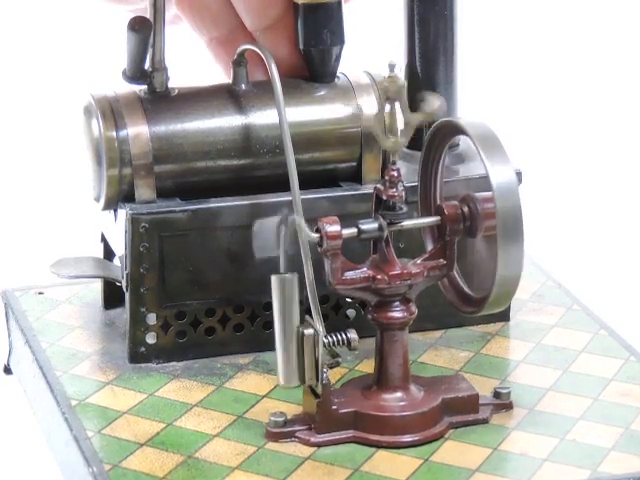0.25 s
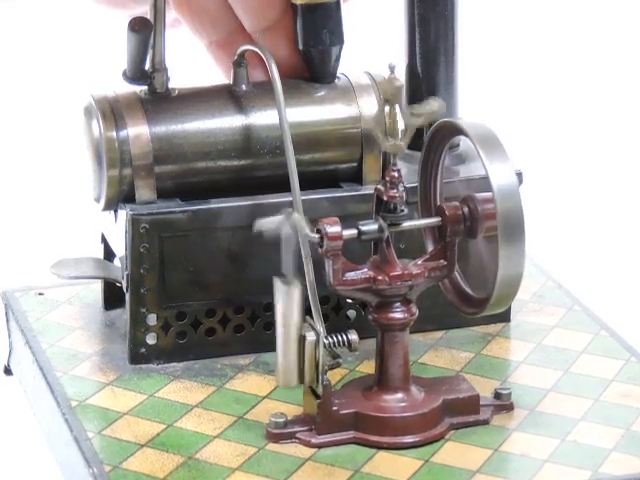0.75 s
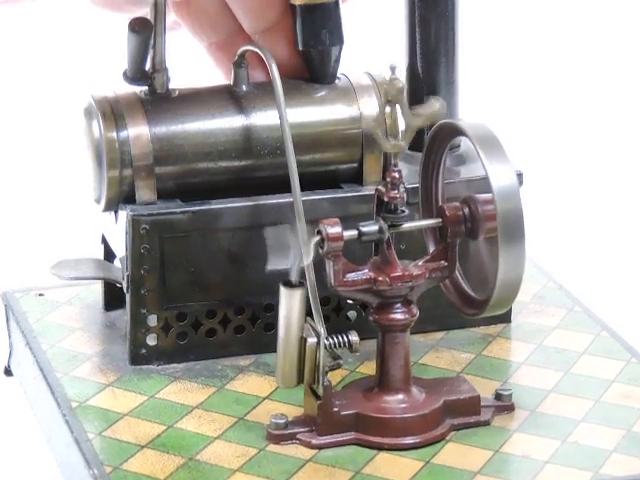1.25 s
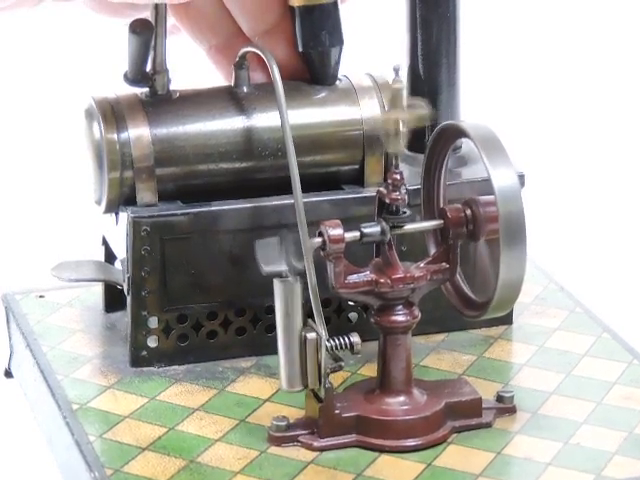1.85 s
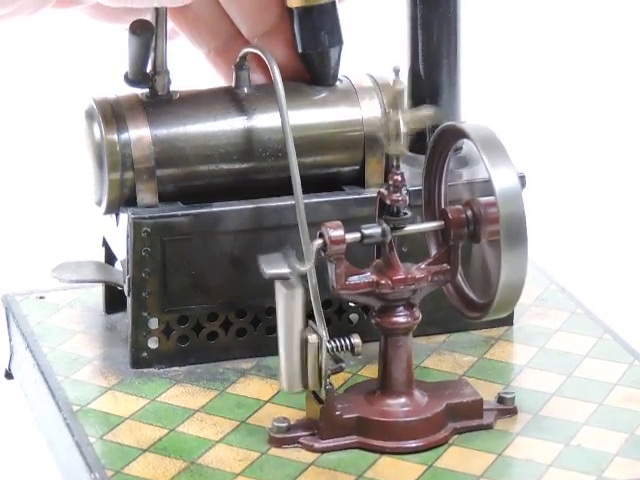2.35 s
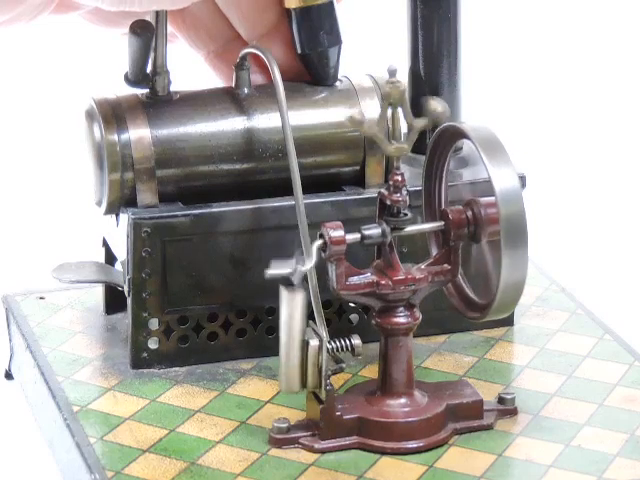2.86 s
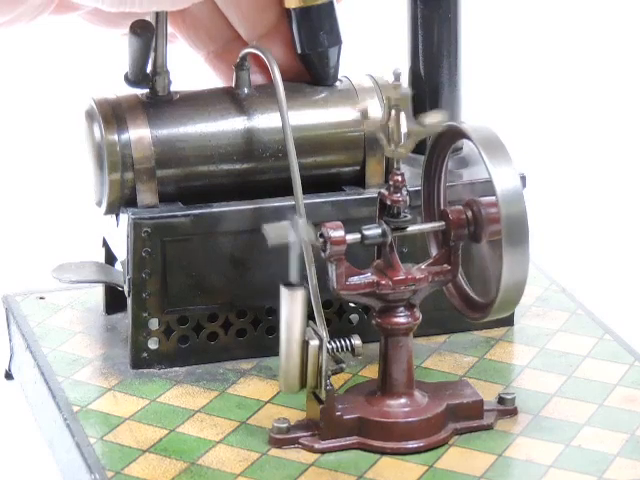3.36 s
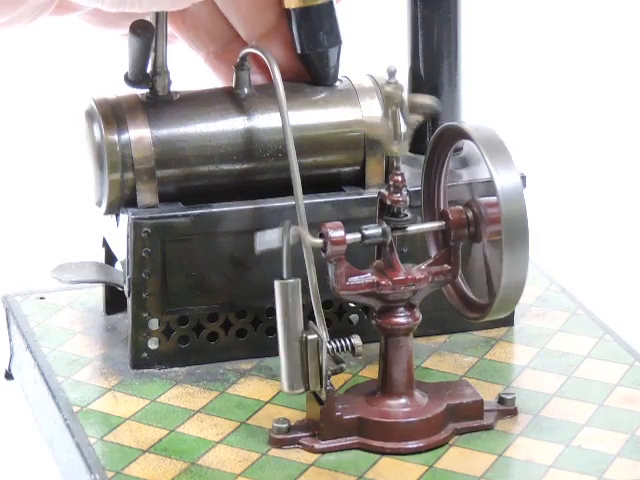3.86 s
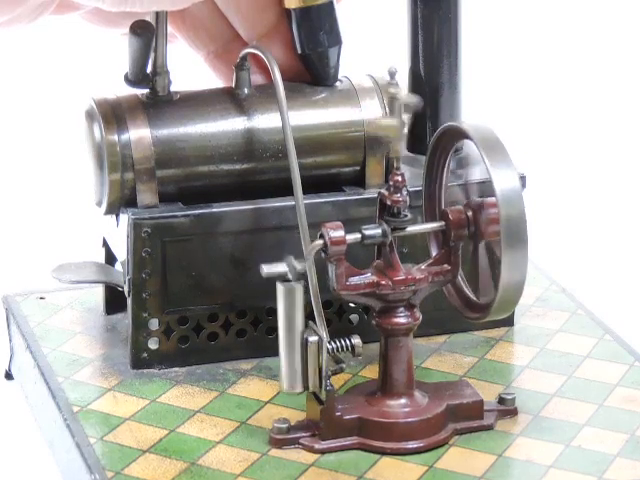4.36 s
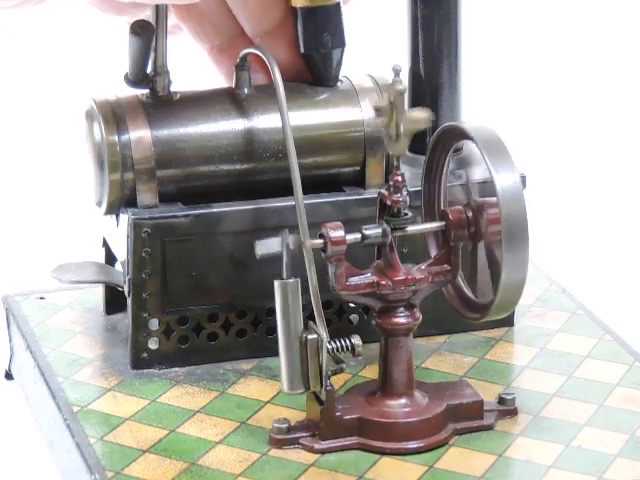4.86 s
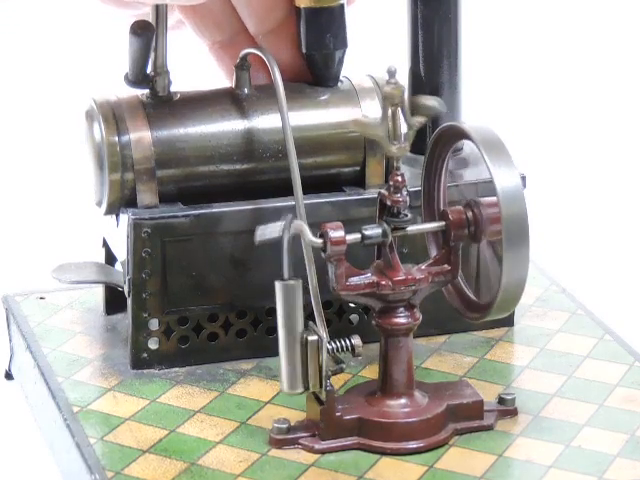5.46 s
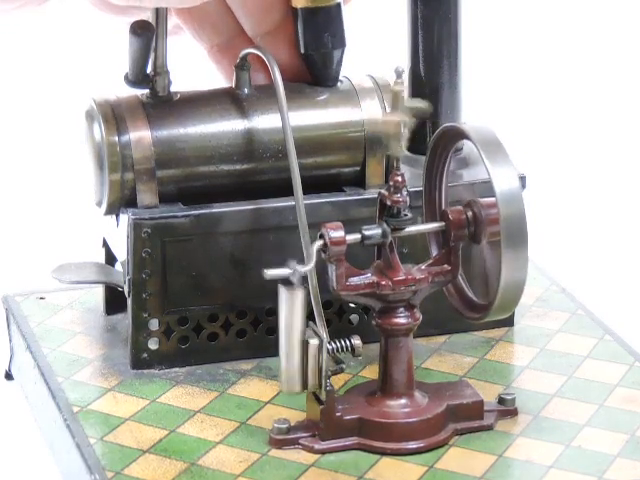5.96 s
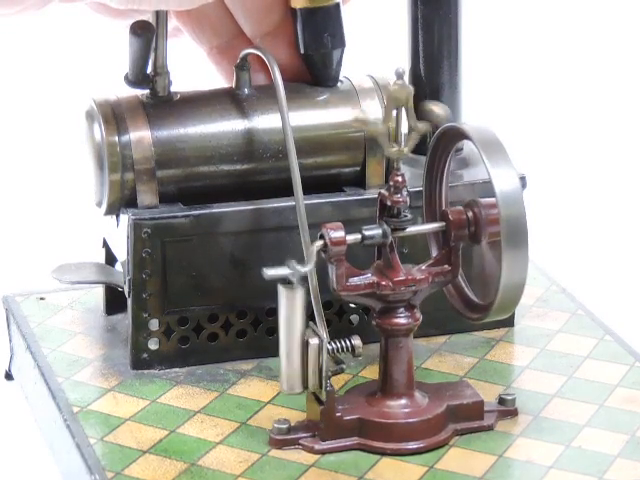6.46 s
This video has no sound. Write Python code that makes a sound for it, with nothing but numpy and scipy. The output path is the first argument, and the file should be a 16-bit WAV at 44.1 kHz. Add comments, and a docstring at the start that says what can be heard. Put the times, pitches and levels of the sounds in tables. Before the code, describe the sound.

A toy steam engine runs at constant high speed, close to a stereo microphone. Its crank makes a fast, even, buzzing beat with a loose metallic rattle. Steam hisses broadly and sputters around it. After about two seconds the whole softens while a thin, very high jet comes forward, then near five seconds the jet drops away and the fuller rattle and hiss return.

```python
"""A quick even beat is heard first, with a loose rattle on top: a toy steam engine near 970 turns a minute.
The beat is a sum of crank harmonics phased by the knocks of each turn; the rattle is noise flaring at them.
Filtered noise forms the steam: a broad hiss, sputtering port resonances and a thin bright jet.
The jet swells in the middle while the rest sounds softer, then dies back for a moment."""
import sys
import numpy as np
from scipy import signal
from scipy.fft import rfft, irfft
from scipy.io import wavfile
from scipy.ndimage import uniform_filter1d

SR = 44100
rng = np.random.default_rng(int(sys.argv[2]) if len(sys.argv) > 2 else 0)


def to_wav(s):
    """Save 16-bit WAV."""
    ch = np.atleast_2d(s).T  # columns
    pcm = np.round(np.clip(ch, -1, 1) * 32767)  # PCM
    wavfile.write(sys.argv[1], SR, pcm.astype(np.int16))


N = 295161

# Crankshaft speed. Each row: time in seconds, turns per minute.
CRANK_SPEED = [(0, 965.8), (0.9, 966.3), (1.5, 968.0), (2.9, 970.1), (3.7, 969.4), (5.0, 969.3),
               (5.6, 967.1), (6.69, 968.1)]
# Strongest vibrations of the base. Each row: multiple of the crank frequency, relative amplitude in dB.
BASE_HARMONICS = [(2, -75), (3, -64.5), (6, -54), (8, -62), (9, -61.5), (10, -60), (11, -62), (14, -51),
                  (15, -68.5), (16, -62), (17, -61), (19, -63), (20, -64), (22, -67), (24, -66), (25, -67),
                  (26, -65), (28, -68.5), (30, -62.5), (31, -85), (33, -60.5), (35, -77), (36, -81),
                  (37, -61.5), (38, -63)]
# Force of the jet. Each row: time in seconds, force from 0 (soft) to 1 (hard).
JET_FORCE = [(0, 0.29), (1.25, 0), (1.6, 0.26), (2.1, 0.44), (2.6, 0.81), (3.2, 0.9), (4.5, 0.98),
             (4.77, .44), (4.97, 0), (6.69, 0.29)]
# Knocks in each turn. Each row: place as a share of the turn, relative strength.
TURN_KNOCKS = [(.374, 1.0), (.514, .55), (.735, .45), (.883, .8), (.014, .6)]
# Spectrum of the rattle. Each row: frequency in Hz, relative density in dB per Hz.
RATTLE_SPECTRUM = [(20, -10), (42, 1), (75, -14.5), (130, -7.5), (200, -6), (260, -0.5), (350, -5),
                   (490, 0), (620, 1.5), (680, -2.5), (760, 1), (870, -4), (1230, -5), (1500, -21),
                   (4000, -53)]
# Spectrum of the broad steam hiss. Each row: frequency in Hz, relative density in dB per Hz.
HISS_SPECTRUM = [(200, -20), (1300, 0.5), (3100, 1), (3650, 3), (3950, 0), (4400, -2), (4570, 2),
                 (4750, -0.5), (5050, -4.5), (6300, 1), (7000, 0), (9000, -2), (11000, -4), (16000, -22)]
# Spectrum of the jet at force 0. Each row: frequency in Hz, relative density in dB per Hz.
SOFT_JET_SPECTRUM = [(3000, -40), (7000, -19), (10000, -12), (10900, -13), (11600, -4.5), (12250, -2.5),
                     (12600, -6), (13050, 0), (13500, -1), (14300, -5), (15000, -3.5), (15800, -6.5)]
# Spectrum of the jet at force 1. Each row: frequency in Hz, relative density in dB per Hz.
HARD_JET_SPECTRUM = [(3000, -36), (7600, -18), (8500, -12.5), (9050, -15), (10100, -8.5), (10850, -14),
                     (11400, -1.5), (11900, -4), (12300, -2), (12600, -7.5), (13200, -1.5), (14700, 0),
                     (15200, -4.5), (15800, -6)]
# Resonances of the steam ports. Each row: frequency in Hz at half force, width in Hz,
# relative level in dB with a soft jet, relative level in dB with a hard jet.
PORT_RESONANCES = [(5270, 120, -2, 0), (5460, 100, 1, 1.5), (5625, 70, -1, -6), (5745, 100, 1.5, -5),
                   (5885, 140, .5, -4)]
# Relation of the two microphone signals. Each row: frequency in Hz, likeness from 0 to 1,
# left minus right level in dB, phase lead of the left in radians.
MICROPHONE_PAIR = [(100, 0.89, -2, -0.76), (480, .98, 6.5, 0.22), (920, 0.98, 2.5, -0.51),
                   (1700, 0.82, 5, -0.58), (3020, 0.44, 1, -0.51), (3700, 0.52, 5, 0.58),
                   (5000, 0, 2, 0.08), (5300, 0.6, 9, 1), (6160, 0.5, 4.5, 0.97), (6440, 0.24, 2, 0.1),
                   (7440, 0.37, 3, 0.3), (9400, 0.07, 3.5, -0.51), (12000, 0.6, 3.5, -0.35),
                   (13400, 0.25, 9, -0.63), (14500, 0.8, 1, -0.61), (15700, .5, 1, -.7)]
# Shared loudness of all layers, dipping while the jet is loud.
# Each row: time in seconds, level in dB before each voice's own gain.
SHARED_LEVEL = [(0.0, -47), (0.03, -46), (0.73, -46.5), (0.88, -45.5), (1.32, -46), (1.43, -42.5),
                (1.49, -45), (2.07, -45.5), (2.4, -50), (2.96, -51), (4.27, -50.5), (4.92, -51.5),
                (5.22, -44), (6.69, -45.5)]

EDGE_HZ = 15740  # upper limit of the band
T = np.arange(N) / SR  # sample times, s
BINS = np.fft.rfftfreq(2048, 1 / SR)  # spectral bins, Hz
FRAMES = np.arange(N // 512 + 3) * 512 / SR  # times of the short-time spectra, s
# Force at the middle of the change to full blast, and the scale of that smooth change
BLAST_FORCE, BLAST_RANGE = 0.45, 0.13
# Change of each voice's level at full blast (dB)
BLAST_WORKS_DB, BLAST_HISS_DB, BLAST_PORTS_DB, BLAST_JET_DB = 0.34, -0.9, -3.5, 9
# The beat grows firmer and the jet a little weaker as the run goes on (dB per s)
BEAT_DB_PER_S, JET_DB_PER_S = 0.38, -0.2
# Share by which the port resonances sink from a soft to a hard jet
PORT_SAG = 0.0094


def engine(works_db=3.0):
    """Rotational excitation: beat and rattle share the phase of a crankshaft that turns slightly unevenly."""
    steady_turns = np.cumsum(at(CRANK_SPEED, T)) / 60 / SR
    turns = steady_turns + .0025 * wander(6)
    level = amp(works_db) * loudness(BLAST_WORKS_DB)
    # scaling to rms 1 keeps only the course of the beat's level
    beat_course = evened(level * amp(BEAT_DB_PER_S * T))
    return beat_course * beat(turns) + level * rattle(turns)


def beat(turns, shake_db=0, upper_db=-71, fall_db=-13, waver=0.11):
    """Fourier synthesis: knocks repeating each turn shake the tin base at multiples of the crank frequency."""
    # weaker harmonics above the tabled ones fall by fall_db per octave, with random scatter
    upper = np.arange(BASE_HARMONICS[-1][0] + 1, 90)
    upper_levels = upper_db + fall_db * np.log2(upper / upper[0])
    upper_levels = upper_levels + 3.5 * rng.standard_normal(len(upper))
    harmonics = list(BASE_HARMONICS) + list(zip(upper, upper_levels))
    sways = [1 + waver * wander(12.0) for _ in range(7)]
    vibration = np.zeros(N)
    for i, (k, db) in enumerate(harmonics):
        k = round(k)
        # the knocks set the phase of each harmonic
        push = sum(strength * np.exp(-2j * np.pi * k * place) for place, strength in TURN_KNOCKS)
        # random phase scatter, wider for higher harmonics, softens the knocks
        scatter = (.5 + k / 20) * rng.standard_normal()
        phase = np.angle(push) + scatter
        line = np.cos(2 * np.pi * k * turns + phase)
        vibration += amp(db + shake_db) * sways[i % len(sways)] * line
    return vibration * amp(np.array([[1.9], [-2.5]]))  # left and right gain, dB


def rattle(turns, knock=0.2, length=0.059, rattle_db=-7):
    """Impact excitation: play in crank and bearings gives noise whose envelope decays after each knock."""
    # length is the decay constant as a share of a turn
    flare = sum(strength * np.exp(-((turns - place) % 1) / length) for place, strength in TURN_KNOCKS)
    envelope = evened(1 + knock * flare)
    shape = in_band(amp(colour(RATTLE_SPECTRUM, BINS)), (300, 1500))
    return amp(rattle_db) * envelope * noise(shape, ripple_db=11)


def jet(jet_db=0.65, flutter_db=0.58, edge_hz=10150, edge_width_hz=380, edge_db=5):
    """Jet noise: its spectrum shifts with force, its brightest band climbing as the jet blows harder."""
    force = np.clip(at(JET_FORCE, FRAMES), 0, 1)[:, None]
    soft, hard = colour(SOFT_JET_SPECTRUM, BINS), colour(HARD_JET_SPECTRUM, BINS)
    tone = (1 - force) * soft + force * hard
    # a lower band sings most at half force
    edge_band = np.exp(-((BINS - edge_hz) / edge_width_hz) ** 2)
    edge = edge_db * np.sin(np.pi * force) ** 2 * edge_band
    shape = in_band(amp(tone + edge), (11000, 15600))
    gain = amp(jet_db + JET_DB_PER_S * T + flutter_db * wander(22))
    return gain * loudness(BLAST_JET_DB) * noise(shape, ripple_db=5.5)


def ports(ports_db=-0.43, sputter_db=0.6):
    """Resonance: wet steam sputters through narrow ports and rings a cluster of resonances."""
    force = np.clip(at(JET_FORCE, FRAMES), 0, 1)[:, None]
    bend = 1 - PORT_SAG * (force - .5)
    power = 0
    for hz, width, soft, hard in PORT_RESONANCES:
        peak = amp(soft + (hard - soft) * force) ** 2
        power = power + peak / (1 + ((BINS - hz * bend) / width) ** 2) ** 2
    shape = in_band(np.sqrt(power), (5150, 6050))
    gain = amp(ports_db + sputter_db * wander(22))
    return gain * loudness(BLAST_PORTS_DB) * noise(shape, ripple_db=5.5)


def hiss(hiss_db=-3.0):
    """Turbulence noise: the boiler and leaking steam give a broad hiss of fixed spectrum."""
    shape = in_band(amp(colour(HISS_SPECTRUM, BINS)), (1500, 4800))
    return amp(hiss_db) * loudness(BLAST_HISS_DB) * noise(shape, ripple_db=4.0)


def loudness(blast_db):
    """Gain modulation: a voice follows the shared level, shifted by blast_db at full blast."""
    blast = .5 + .5 * np.tanh((at(JET_FORCE, T) - BLAST_FORCE) / BLAST_RANGE / 2)
    return amp(at(SHARED_LEVEL, T) + blast_db * blast)


def noise(shape, ripple_db):
    """Partial coherence and interference: coloured noise at two microphones, its treble finely rippled."""
    white = rng.standard_normal((2, (len(FRAMES) - 1) * 512))
    a, b = signal.stft(white, nperseg=2048, noverlap=1536)[2].transpose(0, 2, 1)
    same = np.clip(colour(MICROPHONE_PAIR, BINS), 0, 1)
    lean = amp(colour(MICROPHONE_PAIR, BINS, order=2) / 2)
    lead = colour(MICROPHONE_PAIR, BINS, order=3)
    left = a * lean
    right = (same * a + np.sqrt(1 - same ** 2) * b) * np.exp(-1j * lead) / lean
    # dividing by the rms gain of the left-right mean gives that mean the wanted spectrum
    centre = np.sqrt(lean ** 2 + lean ** -2 + 2 * same * np.cos(lead)) / 2
    spectra = np.array([left, right]) / centre * shape
    sound = signal.istft(spectra.transpose(0, 2, 1), nperseg=2048, noverlap=1536)[1][:, :N]
    # the fixed ripple is deepest where reflections outweigh the direct sound
    depth_db = ripple_db * np.sqrt(1 - same ** 2)
    ripple = amp(depth_db * rng.uniform(-1.1, 1, len(BINS)))
    ripple /= np.sqrt(uniform_filter1d(ripple ** 2, size=9))
    fine_ripple = np.interp(np.fft.rfftfreq(N, 1 / SR), BINS, ripple)
    return irfft(rfft(sound) * fine_ripple, N)


def in_band(shape, band):
    """Power normalisation: scales a spectrum by its power inside the band (Hz), so levels compare."""
    inside = (BINS > band[0]) & (BINS < band[1])
    return shape / np.sqrt(np.mean(shape ** 2 * inside, axis=-1, keepdims=True))


def wander(rate_hz):
    """Low-pass filtering: white noise kept mainly below rate_hz becomes slow random motion of rms 1."""
    hz = np.fft.rfftfreq(N, 1 / SR)
    return evened(irfft(rfft(rng.standard_normal(N)) / (1 + (hz / rate_hz) ** 4), N))


def colour(rows, hz, order=1):
    """Logarithmic pitch scale: interpolates one column of a spectrum over log frequency."""
    rows = np.array(rows, float)
    return np.interp(np.log(hz + 1), np.log(rows[:, 0]), rows[:, order])


def at(rows, t, order=1):
    """Linear interpolation: reads one column of a time curve."""
    rows = np.array(rows, float)
    return np.interp(t, rows[:, 0], rows[:, order])


def evened(x):
    """Root-mean-square normalisation: scales to rms 1."""
    return x / np.sqrt(np.mean(x ** 2) + 1e-20)


def amp(db):
    """Decibel law: converts decibels to amplitude gain."""
    return 10 ** (np.asarray(db) / 20)


def scene():
    """Superposition: the works and the three voices of the steam add."""
    return engine() + jet() + ports() + hiss()


def record(dry):
    """Band limitation: a symmetric low-pass filter removes what lies above EDGE_HZ."""
    low_pass = signal.firwin(1023, EDGE_HZ, window=("kaiser", 9), fs=SR)
    return signal.oaconvolve(dry, low_pass[None], "same")


dry = scene()
out = record(dry)
to_wav(out)
```